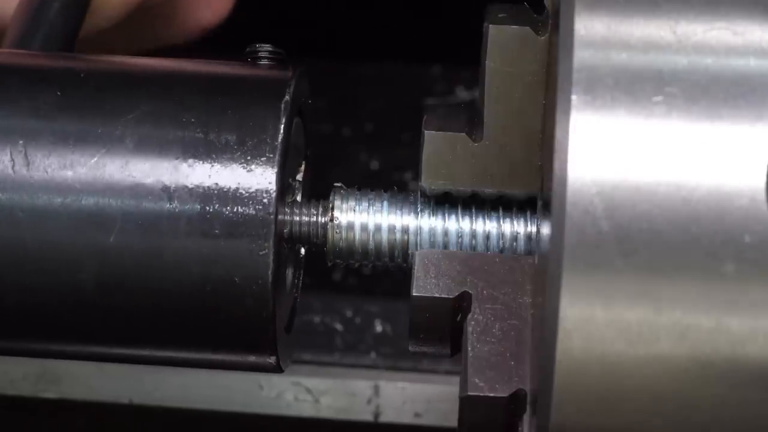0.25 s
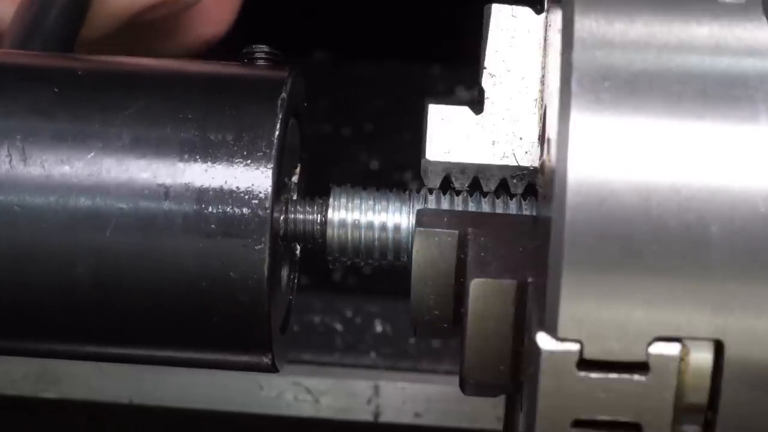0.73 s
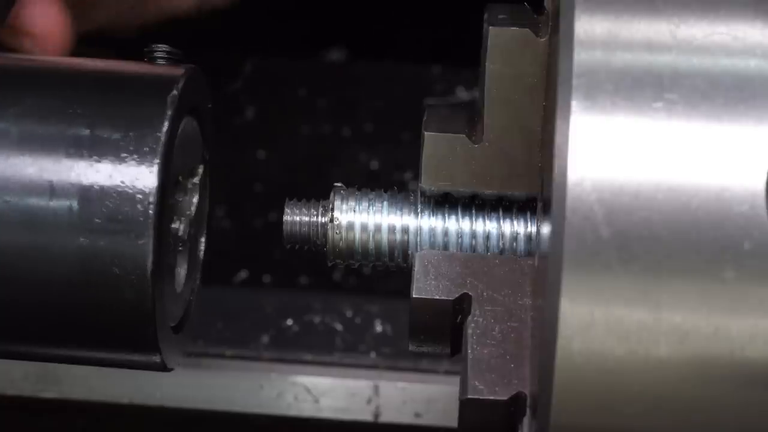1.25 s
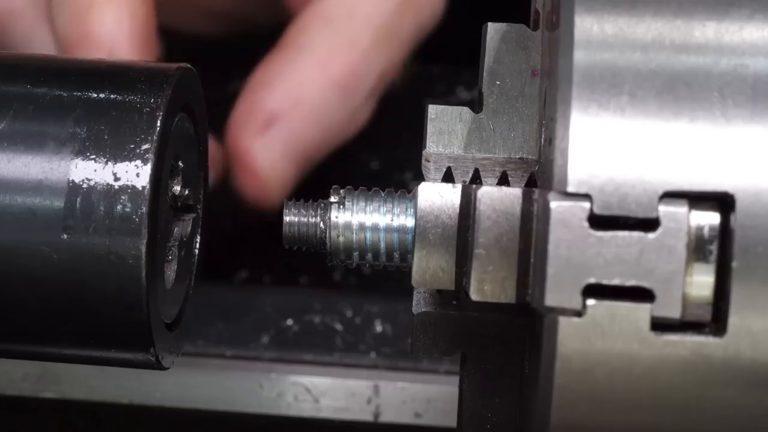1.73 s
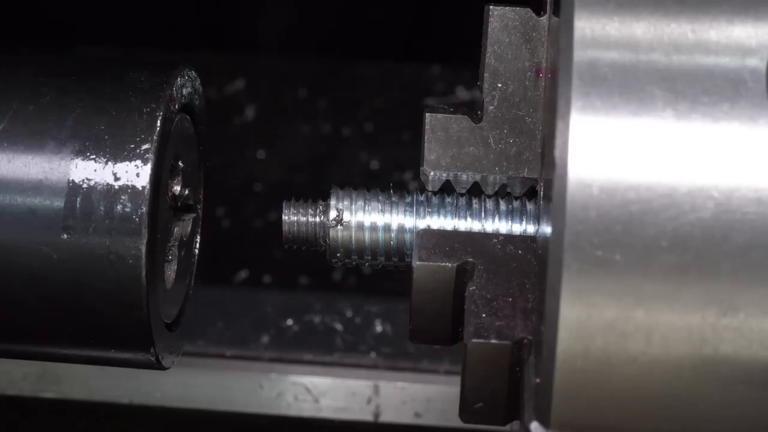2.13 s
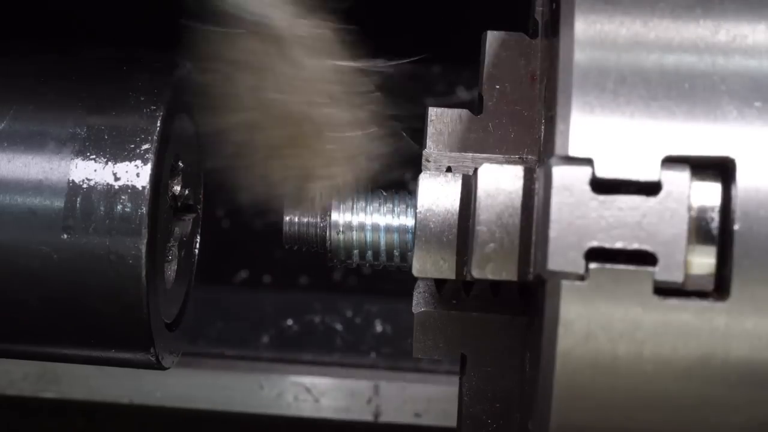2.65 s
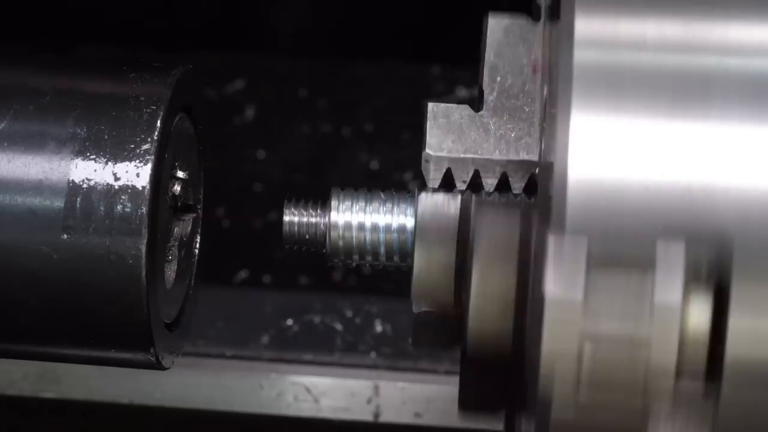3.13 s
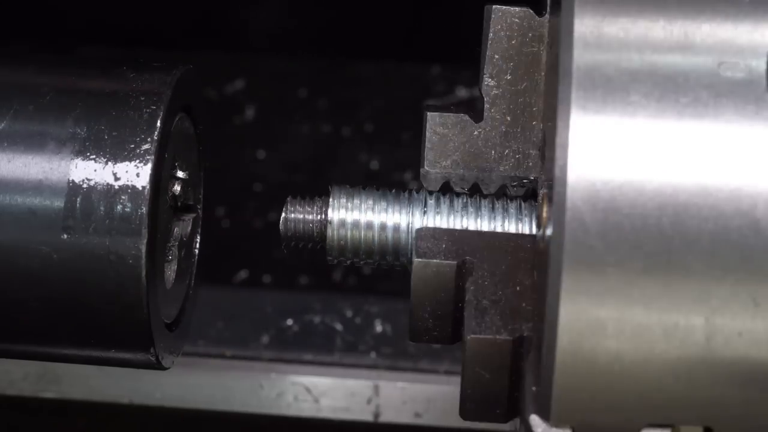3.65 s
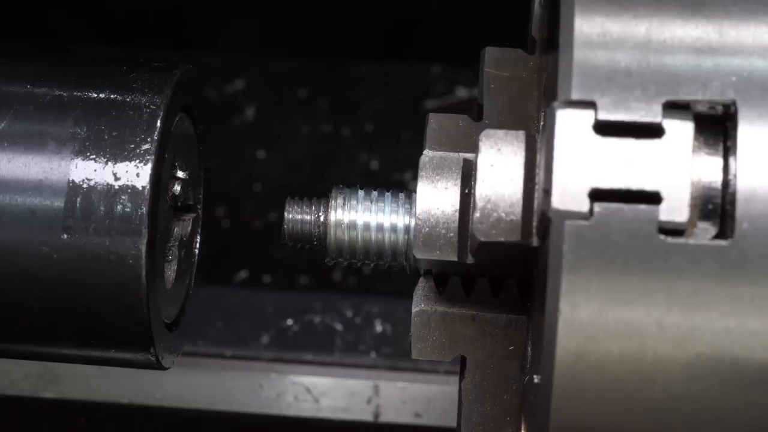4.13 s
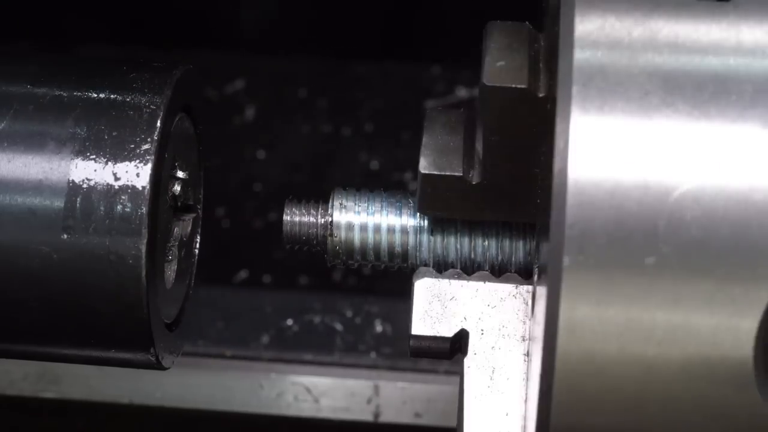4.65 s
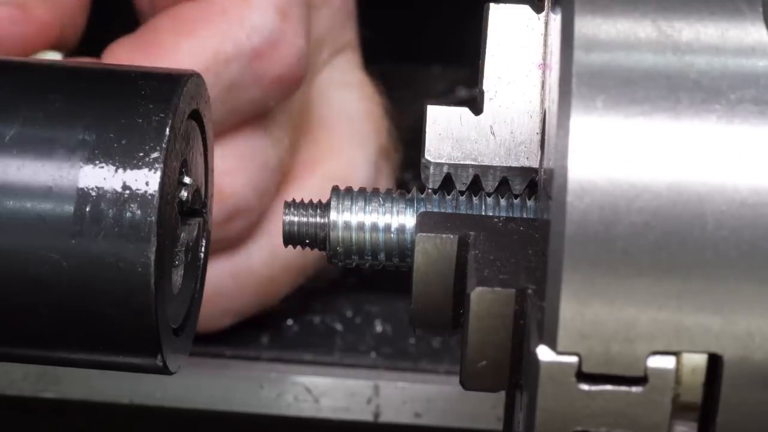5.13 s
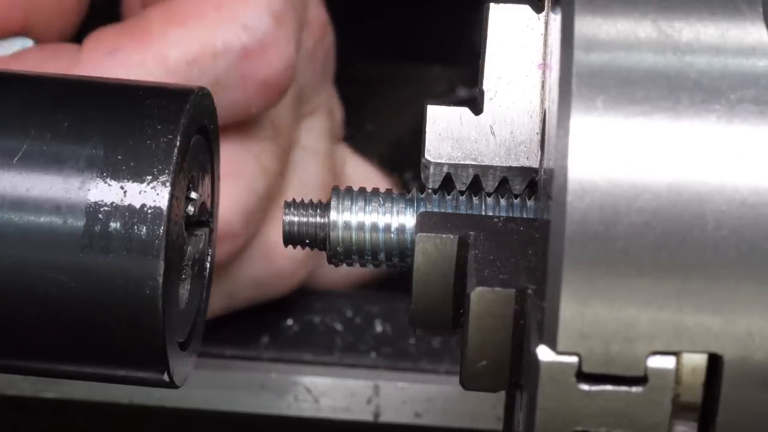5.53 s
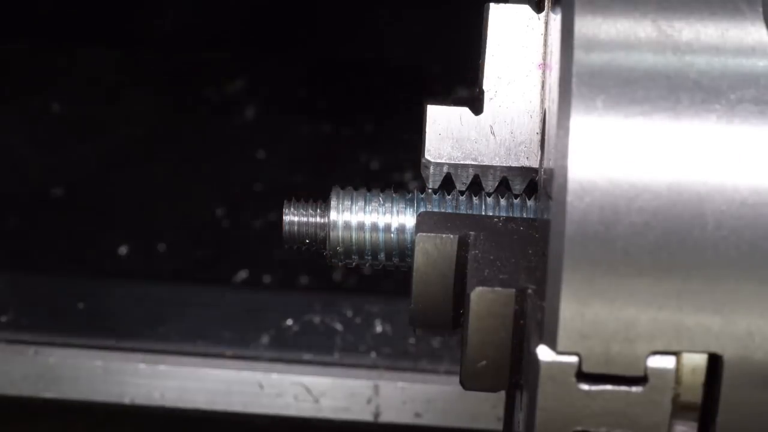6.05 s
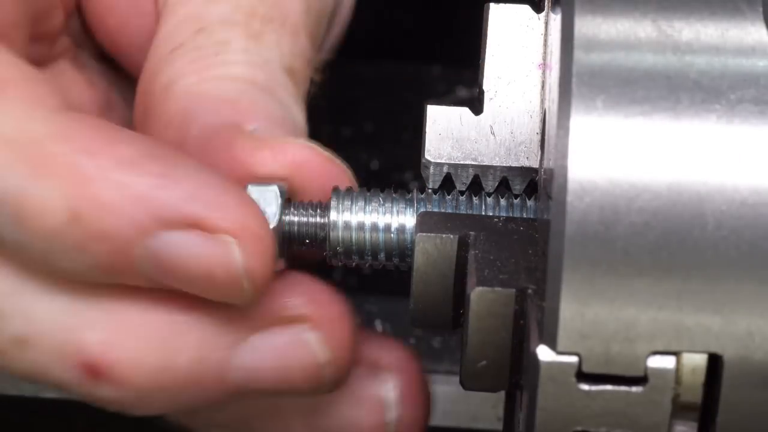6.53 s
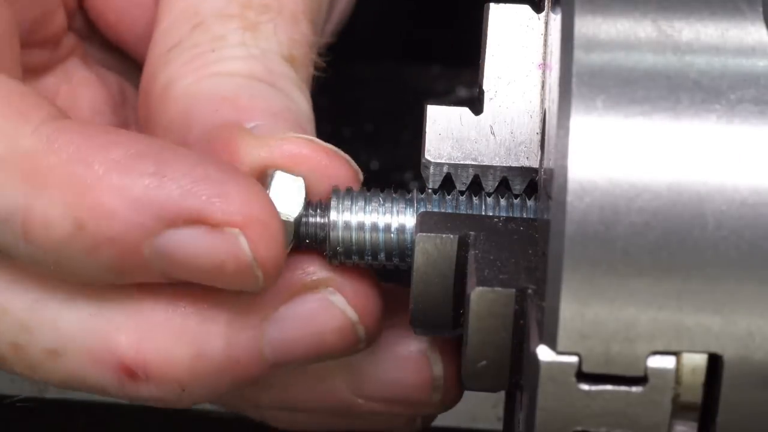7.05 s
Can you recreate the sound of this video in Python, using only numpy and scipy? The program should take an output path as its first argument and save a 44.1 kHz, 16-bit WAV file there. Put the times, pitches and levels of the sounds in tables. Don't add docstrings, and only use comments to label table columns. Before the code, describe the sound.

Metal knocks and rattles at a small lathe, soft bristly brush flicks, then loud steel bangs and a clear clink, ending with light taps.

```python
import sys
import numpy as np
from scipy import signal
from scipy.fft import rfft, irfft
from scipy.io import wavfile
from scipy.ndimage import uniform_filter1d

SR = 44100
rng = np.random.default_rng(int(sys.argv[2]) if len(sys.argv) > 2 else 0)


def gain_from_decibels(decibels):
    exponent = np.asarray(decibels, float) / 20
    return 10 ** exponent


def pcm_store(signal):
    levels = np.round(np.clip(np.atleast_2d(signal), -1, 1) * 32767)
    wavfile.write(sys.argv[1], SR, levels.astype(np.int16).T)


N = 321930
LEAD_IN = 600

# (f/Hz, width/Hz, level/dB)
CASTING = [(560, 140, -7), (623.5, 57, -6.5), (695.3, 60, -7), (829, 110, -3.5), (1112, 310, -5.5),
           (1230, 324, -0.5), (1380, 570, -5)]
# (f/Hz, width/Hz, level/dB)
UPPER = [(1940, 290, 4), (2160, 99, 2.5), (2316, 110, 2.5), (3100, 160, -1.5), (3595, 97, -0.5),
         (4070, 180, -1.5), (5000, 400, -5)]
# (f/Hz, level/dB, t60/s)
HOLDER = [(2369, 0, .25), (5523, -11, .22), (6761, -6, .12), (7700, -9, .1), (8366, -15, .12),
          (8920, -10, .12), (9660, 0, .14), (10350, -6, .14), (11300, -9, .1), (12170, -12, .1),
          (13100, -18, .15), (13960, -12, .15), (14950, -16, .12)]
# (t/s, left minus right/dB)
EAR_BIAS = [(0, -4), (1.2, 0.5), (2, -1.5), (3.9, -2.5), (4.4, 3), (5.9, 1.5), (6, -3), (7.3, -1)]


def evened(x):
    return x / np.sqrt(np.mean(x ** 2) + 1e-20)


def peaked(x):
    return x / abs(x).max()


def read(points, hz):
    f, value = np.transpose(points)
    return np.interp(np.log(hz + 1), np.log(f + 1), value)


def hand_pan(s):
    return np.interp(s, *np.transpose(EAR_BIAS))


def add(mix, s, sound, pan_db=0.):
    part = mix[:, max(round(s * SR), 0):][:, :len(sound)]
    gains = gain_from_decibels(np.array([[pan_db / 2], [-pan_db / 2]]))
    part += gains * sound[:part.shape[1]]


def coloured(x, points):
    gain = gain_from_decibels(read(points, np.fft.rfftfreq(len(x), 1 / SR)))
    return irfft(rfft(x) * gain, len(x))


def body(x, peaks):
    f = np.fft.rfftfreq(len(x), 1 / SR)
    response = 0
    for k, (hz, width, db) in enumerate(peaks):
        resonance = 1j * width * f / (hz ** 2 - f ** 2 + 1j * width * f)
        response = response + (-1) ** k * gain_from_decibels(db) / np.sqrt(width) * resonance ** 2
    return irfft(rfft(x) * response, len(x))


def contact(t60, rise, size=8192, scuff_db=-13.5):
    t = (np.arange(size) - LEAD_IN) / SR
    after = np.maximum(t, 0)
    blow = (1 - np.exp(-after / rise)) ** 2 * gain_from_decibels(-60 * after / max(t60, .003))
    scuff = gain_from_decibels(scuff_db) * np.exp(-abs(t) / 0.0033)
    landing = 1.5 * np.exp(-((t - 2 * rise) / .00004) ** 2)
    return rng.standard_normal(size) * (blow + scuff) + landing


def knocks():
    # (t/s, peak level/dB, main f/Hz, upper resonances rel level/dB)
    chuck = [(0.259, -22, 1280, 3), (0.279, -29.5, 1300, 4), (0.367, -38, 676, -26),
             (0.422, -34.5, 675, -33), (0.572, -43, 593, -27), (0.606, -28.5, 716, -24),
             (0.618, -27, 712, -26), (0.662, -46.5, 637, 8), (0.81, -59, 900, 14.5),
             (0.854, -25.5, 856, -14.5), (1.531, -39.5, 774, -14), (1.553, -44.5, 580, 0.5),
             (1.571, -20, 858, -13.5), (1.582, -22, 682, -31), (1.63, -39, 1200, 0), (1.881, -41, 1103, -9),
             (1.933, -52, 750, -2.5), (0.336, -46, 656, -24)]
    # (t/s, peak level/dB, main f/Hz, upper resonances rel level/dB)
    taps = [(2.22, -56, 1320, -7), (2.322, -43, 510, -12), (2.733, -63, 1470, 14), (2.812, -44.5, 682, -21),
            (2.919, -45, 1270, -5), (3.168, -37, 1540, -10.5), (3.47, -43.5, 1380, 2.5),
            (3.63, -50, 830, 2), (4.819, -43.5, 510, -19), (4.929, -40.5, 1350, -7),
            (6.526, -36.5, 1230, -1.5), (6.544, -39.5, 726, -0.5), (6.577, -41, 1170, -6),
            (6.788, -45, 790, 0), (6.96, -41, 708, 4.5), (6.97, -36.5, 727, -16.5),
            (7.104, -50.5, 638, -3.5)]
    # (t/s, peak level/dB, main f/Hz, upper resonances rel level/dB)
    die = [(1.001, -31.5, 840, 0), (1.011, -28, 930, -7), (1.031, -40, 975, -3), (1.19, -22, 898, -7.5),
           (1.204, -23, 747, -6.5), (1.261, -35, 820, -30)]
    # (t/s, peak level/dB, main f/Hz, upper resonances rel level/dB, upper f/Hz)
    bangs = [(4.4785, -25, 900, 7, 3620), (4.531, -25, 760, 5, 2470), (5.112, -26, 1207, -6, 3800),
             (5.12, -22, 716, -6.5, 1940), (5.155, -42.5, 776, 5, 1950), (5.177, -28.5, 806, -12, 1880),
             (5.226, -34, 748, -28, 2110), (5.277, -44.5, 1300, -8, 1810), (5.328, -42, 524, -2, 3060),
             (5.615, -34.5, 956, 9.5, 2240), (5.721, -19, 1140, 1, 3540), (5.763, -11, 790, -11, 1950),
             (5.779, -20, 836, -2.5, 2400), (5.836, -11.5, 830, -16, 1980), (5.904, -23.5, 810, -1, 2460),
             (5.933, -22, 1116, -14, 1720), (5.99, -13.5, 727, 2.5, 1950)]
    # main upper resonance (Hz), time the contact chatters (s)
    rows = [(*row, 1950, 0.031) for row in chuck]
    rows += [(*row, 2300, 0.027) for row in taps]
    rows += [(*row, 1790, 0.031) for row in die]
    rows += [(*row, 0.011) for row in bangs]
    out = np.zeros((2, N))
    others = [(f, 4.5 * width, level) for f, width, level in UPPER]
    for s, db, hz, upper_db, upper_hz, t60 in rows:
        low = body(contact(t60, 0.001259), [(hz, 220, 13)] + CASTING)
        upper = body(contact(1.89 * t60, 0.0009905), [(upper_hz, 400, 7)] + others)
        knock = peaked(low) + gain_from_decibels(upper_db + 4) * peaked(upper)
        add(out, s - .001 - LEAD_IN / SR, gain_from_decibels(db - 1.0) * knock, hand_pan(s))
    return out


def snaps():
    # (t/s, peak level/dB, centre f/Hz)
    snap_rows = [(0.2597, -15, 1910), (.6195, -23.5, 666), (0.8546, -25.5, 870), (1.033, -30, 1500),
                 (1.584, -29, 706), (2.882, -43, 3500), (3.1705, -29, 1390), (4.4795, -10, 2300),
                 (4.533, -15.5, 1900), (5.342, -26, 2130), (5.616, -10.5, 2470), (5.7631, -6, 820),
                 (5.99, -4, 1900)]
    out, t = np.zeros((2, N)), np.arange(-64, 2000) / SR
    for s, db, hz in snap_rows:
        spike = np.exp(-(4 * hz * t) ** 2)
        snap = peaked(body(spike, [(1.196 * hz, 1.34 * hz, 0)]))
        add(out, s + t[0], gain_from_decibels(db) * snap, hand_pan(s))
    return out


def rings():
    # (t/s, peak level/dB, f/Hz, t60/s)
    ring_rows = [(0.2593, -17, 6050, .03), (.2765, -20, 5900, .025), (0.2796, -16.5, 6100, .025),
                 (0.2778, -22, 3900, .02), (.278, -31, 1400, 0.12), (.615, -21.5, 700, 0.03),
                 (.66, -33, 1950, 0.029), (.999, -27.5, 3004, 0.031), (1.003, -29, 3580, 0.045),
                 (1.19, -28.5, 3070, 0.036), (1.196, -31.5, 3760, 0.047), (1.278, -36.5, 900, 0.036),
                 (1.578, -32.5, 347, 0.065), (1.582, -28, 596, 0.053), (1.627, -20.5, 529, 0.066),
                 (1.64, -37, 282, 0.11), (1.645, -36.5, 367, 0.13), (1.65, -43, 510, 0.084),
                 (4.48, -19.5, 3400, 0.025), (4.479, -25, 1850, .03), (4.531, -23, 1893, 0.039),
                 (5.62, -27, 2372, .2), (5.62, -26, 2420, 0.23), (5.341, -44, 5523, 0.17),
                 (5.341, -33, 6751, .08), (5.341, -22, 10420, .04), (6.787, -41.5, 3900, .02),
                 (5.341, -26, 9706, 0.055), (5.341, -48, 10340, 0.22), (5.902, -28, 440, 0.05),
                 (5.704, -23.5, 784, 0.12), (5.721, -17, 2440, 0.037), (5.721, -19, 3660, .07),
                 (5.742, -13, 823, 0.042), (5.764, -13, 800, 0.05), (5.777, -28, 2380, .07),
                 (5.777, -13, 850, 0.064), (5.79, -15, 834, 0.08), (5.826, -17.5, 881, 0.12),
                 (5.833, -19.5, 1857, 0.039), (5.845, -16.5, 772, 0.082), (5.919, -15.5, 1191, 0.066),
                 (5.114, -27.5, 1175, 0.051), (5.112, -27.5, 710, .08)]
    out, t = np.zeros((2, N)), np.arange(15000) / SR
    for s, db, hz, t60 in ring_rows:
        decay = gain_from_decibels(db - 60 * t / max(t60, .02))
        onset = 1 - np.exp(-t * min(hz, 1800) / 1.6)
        beating = 1 + .45 * np.cos(2 * np.pi * t * 2.2 / max(t60 / 3, .02))
        add(out, s, decay * onset * np.sin(2 * np.pi * hz * t) * beating, hand_pan(s))
    return out


def ticks():
    # (t/s, peak level/dB, band below 8 kHz rel level/dB, contact t60/s)
    tick_rows = [(0.2597, -13.5, 8, 0.045), (0.2765, -22, 15, 0.09), (0.3925, -41.5, -7.5, 0.029),
                 (0.664, -45.5, 3, 0.025), (1.005, -44.5, -1, 0.036), (1.104, -41, -3, 0.025),
                 (1.191, -46, -8, 0.074), (1.321, -37.5, -9, 0.065), (1.5554, -39.5, -7, 0.039),
                 (4.479, -31.5, 9, 0.07), (4.5314, -46, 17, 0.2), (4.9248, -36.5, -7.5, 0.065),
                 (5.1121, -30.5, -4, 0.11), (5.341, -22.5, 1, 0.025), (5.6162, -4, -10.5, 0.0075),
                 (5.736, -29, 5, 0.03), (5.7817, -16.5, -3, 0.026), (5.8864, -46.5, -14.5, 0.014),
                 (6.796, -49, -16.5, .015), (5.122, -40, -3, .04), (5.907, -36, -8, 0.015),
                 (5.9892, -15, 6.5, 0.009), (6.5244, -22.5, -24, 0.01), (6.576, -44, -7, 0.021),
                 (6.7865, -44, -11, 0.025), (6.9611, -32, -16, 0.014)]
    out = np.zeros((2, N))
    for s, db, lower_db, t60 in tick_rows:
        colour = [(3000, -40.0), (4500, lower_db), (7500, lower_db),
                  (9000, -3.5), (13000, -2.5), (16000, -20.5)]
        crack = coloured(contact(t60, 0.00023, scuff_db=-33.0), colour)
        add(out, s - LEAD_IN / SR, gain_from_decibels(db + 0.5) * peaked(crack), 1)
    return out


def clinks():
    # (t/s, level/dB, lowest mode rel level/dB, rattle t60/s)
    clink_rows = [
        (5.338, -52, -37, 0.0056),
        (5.618, -45.5, -10.5, 0.17),
        (5.779, -43, -8.5, 0.083),
        (5.882, -55, -15, 0.11),
    ]
    out = np.zeros((2, N))
    for s, db, lowest_db, rattle in clink_rows:
        struck = 3 * rng.standard_normal(len(HOLDER))
        struck[0] += lowest_db
        modes = [(hz, 6 / t60, level + more) for (hz, level, t60), more in zip(HOLDER, struck)]
        clink = body(contact(rattle, 0.0002, size=16384, scuff_db=-38), modes)
        add(out, s - LEAD_IN / SR, gain_from_decibels(db + 13.5) * peaked(clink), 2)
    return out


def squeals():
    # (t/s, length/s, f/Hz,
    # level/dB)
    narrow_tones = [(.485, .045, 2150, -56), (.75, .055, 2150, -59), (1.055, .055, 2150, -57),
                    (2.055, .03, 2460, -56), (4.84, .075, 2120, -57), (4.98, .07, 2130, -61),
                    (5.21, .045, 2200, -50), (5.82, .07, 6150, -44), (5.618, .09, 2420, -32),
                    (5.885, .05, 3650, -37), (.98, .025, 900, -46), (6.3, .09, 2150, -64),
                    (1.21, .06, 6400, -58), (1.72, .07, 1310, -62), (4.615, .03, 2350, -61),
                    (5.33, 0.033, 6800, -43), (5.329, .03, 9700, -45), (5.33, 0.033, 10420, -44),
               (5.62, .08, 14000, -44), (5.62, 0.079, 8366, -44), (5.62, .08, 6185, -43.5),
               (5.62, 0.064, 5400, -40), (5.783, .07, 5609, -43), (5.782, 0.049, 9600, -44.5),
               (5.785, .09, 13140, -54), (5.63, 0.1, 13960, -51), (0.328, 0.15, 287, -60.5),
               (0.949, 0.083, 298, -54), (2.949, 0.52, 299, -67.5), (1.1, 0.052, 10860, -59),
               (5.619, 0.09, 9550, -42), (5.625, 0.076, 8200, -43), (5.616, 0.07, 11200, -32.5),
               (5.625, 0.081, 4360, -38), (5.7, 0.092, 6260, -41.5), (5.724, 0.064, 7640, -41),
               (5.781, 0.051, 9625, -36), (5.782, 0.044, 8980, -34), (5.779, 0.06, 3587, -39),
               (5.88, 0.076, 9540, -48.5), (5.917, .04, 5780, -51), (4.905, 0.095, 2400, -55),
               (4.91, 0.1, 3640, -56.5), (4.922, 0.021, 4400, -50), (1.0, 0.093, 560, -52),
               (0.333, 0.047, 660, -49), (0.35, 0.072, 672, -46), (0.633, 0.053, 718, -45.5),
               (0.698, 0.034, 690, -55), (0.766, 0.028, 315, -60.5), (2.788, 0.071, 692, -57.5),
               (3.022, 0.059, 930, -63), (3.114, .05, 1430, -61), (3.182, 0.081, 712, -59),
               (5.117, 0.033, 9600, -44), (5.226, 0.027, 644, -43), (5.795, .08, 7725, -45),
               (5.998, 0.072, 607, -32.5), (6.004, .09, 1790, -35.5)]
    out = np.zeros((2, N))
    for s, length, hz, db in narrow_tones:
        width = min(hz / 12, 170 if hz < 5000 else 70)
        tone = evened(body(rng.standard_normal(8192), [(hz, width, 0)]))[:round(1.5 * length * SR)]
        u = np.arange(len(tone)) / (length * SR)
        swell = np.sqrt(u / 0.43) * np.exp(.5 - (u / 0.52) ** 2)
        add(out, s, gain_from_decibels(db - 0.5) * tone * swell)
    return out


def friction_db(t):
    # (t/s, length/s, peak level/dB, upper rel level/dB, grit rel level/dB)
    strokes = [(0.318, 0.13, -45, -6, -12), (0.011, 0.09, -75, 8.5, 11), (0.192, 0.032, -74.5, 15, 5),
               (0.479, 0.054, -67, 3, 7.5), (0.592, .12, -51, -8.5, -15), (0.742, .06, -64.5, 2, 5),
               (3.604, 0.062, -62.5, -2, -10), (0.953, 0.31, -59, -2.5, -9), (1.289, 0.074, -50.5, -3, -5),
               (1.643, 0.035, -55, -6, -15), (1.452, 0.13, -58.5, -8, -16), (2.965, 0.37, -63.5, -7, -11),
               (3.381, 0.2, -57, -4, -11), (3.687, 0.15, -58.5, -5.5, -9), (4.286, 0.21, -56.5, -4, -6),
               (4.79, 0.29, -64.5, 2.5, 6), (5.112, 0.11, -43.5, -5.5, -13.5),
               (5.304, 0.055, -46, -30, -10), (5.514, 0.033, -82.5, 8, 25.5),
               (5.695, 0.19, -22, -13, -23.5), (5.874, 0.088, -31, -17, -27),
               (5.982, 0.072, -28.5, 1.5, -34), (6.261, 0.23, -71.5, 3.5, 10.5)]
    # (t/s, level/dB, t60/s, upper rel level/dB, grit rel level/dB)
    shakes = [(.285, -55, 0.44, 3.5, 6.5), (.625, -51, 0.3, -7, -12), (0.866, -53, 1, -5.5, -14),
              (1.212, -43, 0.45, -4.5, -12.5), (1.65, -72.5, 0.95, 11.5, 4), (4.49, -38, 0.26, 10, -14),
              (4.537, -32, 0.13, 2.5, -27.5), (5.224, -44.5, 0.23, -8, -10.5),
              (5.34, -45.5, 0.13, 3.5, 8.5), (5.617, -50, 0.31, 18.5, 21.5), (5.724, -45.5, 0.4, 17.5, 0),
              (5.785, -36.5, 0.22, 4.5, 6), (5.886, -38, 0.21, 5, -11), (6.033, -29, 0.2, 4, -33)]
    moves = []
    for s, length, db, upper_db, grit_db in strokes:
        force_db = db - 21 * (2 * (t - s) / length - 1) ** 2
        moves.append(np.add.outer([0, upper_db, grit_db], force_db))
    for s, db, t60, upper_db, grit_db in shakes:
        force_db = db - np.maximum(60 * (t - s) / max(t60, .03), 3500 * (s - t))
        moves.append(np.add.outer([0, upper_db, grit_db], force_db))
    return np.max(moves, axis=0).clip(-90)


def slides():
    # (f/Hz, width/Hz, level/dB)
    bench = [(110, 30, -23), (222, 150, -21)]
    # (f/Hz, level/dB)
    hiss_colour = [(2350, -14.5), (4000, -3), (5160, -4.5), (5540, -4), (11600, -5), (13000, -11.5),
                   (15500, -31), (16000, -45)]
    upper = [(hz, 2.77 * width, db) for hz, width, db in UPPER]
    loose = [(hz, 14 / t60, db) for hz, db, t60 in HOLDER[1:]]

    def grit(x):
        return evened(coloured(x, hiss_colour)) + 0.51 * evened(body(x, loose))

    shapes = (lambda x: body(x, CASTING + bench), lambda x: body(x, upper), grit)
    t, now = np.arange(0, N, 32) / SR, np.arange(N) / SR
    out = np.zeros((2, N))
    for level_db, shape, wide in zip(friction_db(t), shapes, (.3, .65, .35)):
        drift = uniform_filter1d(uniform_filter1d(rng.standard_normal(N), 200), 200)
        clumps = gain_from_decibels(1.8 * evened(drift))
        grains = rng.standard_normal((2, N)) * (rng.random((2, N)) < .3) * clumps
        mid, side = evened(shape(grains[0])), evened(shape(grains[1]))
        out += gain_from_decibels(np.interp(now, t, level_db)) * np.array([mid + wide * side, mid - wide * side])
    return out * gain_from_decibels(np.outer([.3, -.3], hand_pan(now)))


def brush():
    # (t/s, peak level/dB, swell/s)
    drags = [(2.17, -54, 0.022), (2.325, -54, 0.0037), (2.356, -48, 0.011), (2.44, -47.5, 0.0031),
             (2.462, -42.5, 0.0097), (2.568, -40.5, 0.0056), (2.676, -50, 0.0043), (2.79, -45.5, 0.0064),
             (2.817, -36, 0.0082), (2.902, -44, 0.0075), (2.922, -36, 0.006)]
    # (f/Hz, level/dB)
    bristle = [(240, -45), (400, -10), (655, 2.5), (994, -7.5), (4800, 2.5), (6340, -6), (11200, 5),
               (16000, -4.5)]
    out, t = np.zeros((2, N)), np.arange(-4000, 2000) / SR
    for s, db, swell in drags:
        flicks = rng.standard_normal(len(t)) * gain_from_decibels(0.62 * rng.standard_normal(len(t)))
        stroke = np.where(t < 0, np.exp(-abs(t) / swell), np.exp(-abs(t) / (0.56 * swell)))
        add(out, s + t[0], gain_from_decibels(db) * evened(coloured(flicks, bristle)) * stroke, -1)
    return out


def jolts():
    # (t/s, peak level/dB, f/Hz, t60/s)
    jolt_rows = [(0.425, -35, 128, 0.088), (0.607, -41.5, 316, 0.17), (0.852, -33, 115, 0.11),
                 (1.009, -31, 124, 0.097), (1.195, -27.5, 177, 0.046), (1.342, -36, 126, 0.15),
                 (1.58, -21, 119, 0.06), (1.636, -32.5, 176.6, 0.24), (4.473, -26, 374, 0.056),
                 (4.525, -19.5, 157, 0.02), (5.11, -28, 125, 0.056), (5.135, -30, 125, 0.051),
                 (5.168, -31, 132, 0.053), (5.183, -18, 135, 0.027), (5.316, -35, 171, 0.067),
                 (5.341, -34.5, 130, 0.051), (5.762, -36, 176, 0.057), (5.902, -19.5, 153, 0.028),
                 (5.98, -20.5, 310, 0.024), (6.028, -38, 340, 0.15)]
    out, t = np.zeros((2, N)), np.arange(15000) / SR
    onset = (1 - np.exp(-t / .0035)) ** 2
    for s, db, hz, t60 in jolt_rows:
        swing = np.sin(2 * np.pi * hz * t) + 0.12 * np.sin(2 * np.pi * 340 * t + 6 * rng.random())
        add(out, s, gain_from_decibels(db - .5 - 60 * t / max(t60, .02)) * onset * swing)
    return out


def nearby(x):
    echoes = rng.standard_normal(220) * (rng.random(220) < .06)
    reflected = np.convolve(x.mean(0), echoes / np.linalg.norm(echoes))[:N]
    side = signal.lfilter(*signal.butter(1, 900, "high", fs=SR), reflected)
    return np.array([-side, side])


def shop(x):
    # (f/Hz, t60/s)
    decay = [(150, 0.29), (1000, 0.13), (4000, 0.2), (12000, 0.026)]
    size = SR // 2
    echoes = np.zeros((2, size))
    slots = np.arange(150, size - 20, 20)
    at = slots + rng.integers(0, 20, (2, len(slots)))
    np.put_along_axis(echoes, at, rng.choice([-1., 1.], at.shape), 1)
    hz, t, z = signal.stft(echoes, SR, nperseg=256)
    fade = gain_from_decibels(-60 * t / np.maximum(read(decay, hz), .02)[:, None])
    tail = signal.istft(z * fade, SR, nperseg=256)[1]
    return signal.fftconvolve(x.mean(0)[None], tail / np.linalg.norm(tail[0]), axes=1)[:, :N]


def air():
    # (t/s, level/dB)
    draught = [(0, -69), (.41, -71), (1.97, -63.5), (2.13, -73), (4.02, -71), (4.94, -79), (5.18, -63),
               (5.23, -54), (5.28, -70.5), (6.04, -65.5), (6.77, -88), (7.3, -84)]
    # (f/Hz, level/dB)
    draught_colour = [(5000, -25.5), (8000, -5.5), (11000, -2.5), (14000, -11), (16000, -12)]
    mid, side = rng.standard_normal((2, N))
    hiss = np.array([coloured(mid + .3 * side, draught_colour), coloured(mid - .3 * side, draught_colour)])
    return gain_from_decibels(np.interp(np.arange(N) / SR, *np.transpose(draught)) - 1.5) * evened(hiss)


def room_tone():
    # (f/Hz, level/dB)
    tone_colour = [(15, -78.5), (25, -47), (138, -8.5), (214, -23), (296, -13), (1220, -13.5), (1980, -17),
                   (4600, -22.5), (10400, -24), (15200, -30.5), (16500, -48)]
    # (f/Hz, left-right coherence)
    likeness = [(60, 0.93), (240, 0.48), (950, 0.01), (3770, 0.056), (15000, 0.94)]
    # (f/Hz, width/Hz, level/dB)
    machines = [(10500, 70, -81), (487.3, 15, -80.5), (299.8, 38, -78.5), (132, 55, -69.5)]
    frames, hz = N // 256 + 5, np.fft.rfftfreq(1024, 1 / SR)
    a, b, c, d, patches = rng.standard_normal((frames, 513, 5)).T
    patches = evened(uniform_filter1d(uniform_filter1d(patches, 30, 0), 16, 1))
    same = np.clip(read(likeness, hz), -1, 1)[:, None]
    left = a + 1j * b
    right = same * left + np.sqrt(1 - same ** 2) * (c + 1j * d)
    z = np.array([left, right]) * gain_from_decibels(read(tone_colour, hz)[:, None] + 1.4 * patches)
    tone = signal.istft(z, nperseg=1024, noverlap=768)[1][:, :N]
    whines = np.zeros(N)
    for f, width, db in machines:
        whines += gain_from_decibels(db) * evened(body(rng.standard_normal(N), [(f, width, 0)]))
    return gain_from_decibels(-62.5) * evened(tone) + whines


def scene():
    blows = knocks() + snaps() + rings() + ticks() + clinks() + brush()
    reflected = gain_from_decibels(-7) * nearby(blows) + gain_from_decibels(-16.0) * shop(blows)
    return blows + reflected + squeals() + slides() + jolts() + air() + room_tone()


def top_cut(x):
    return signal.sosfilt(signal.butter(12, 16640, fs=SR, output="sos"), x)


def record(dry):
    heard = signal.sosfilt(signal.butter(2, 58, "high", fs=SR, output="sos"), dry)
    heard = signal.oaconvolve(heard, signal.firwin(255, 15900, fs=SR)[None], "same")
    return top_cut(heard)


dry = scene()
out = record(dry)
pcm_store(out)
```